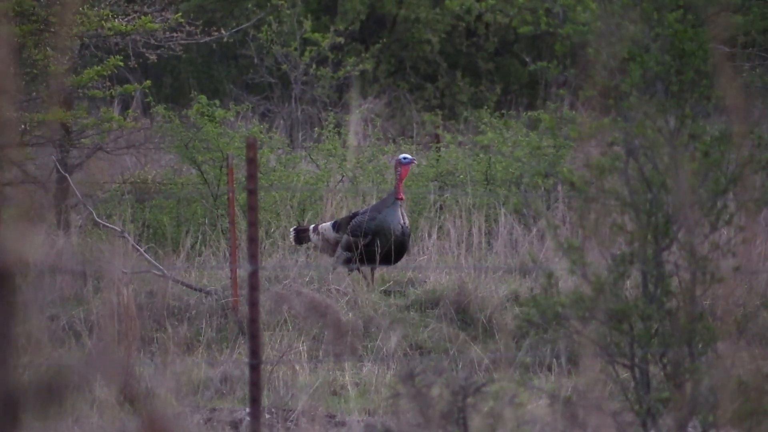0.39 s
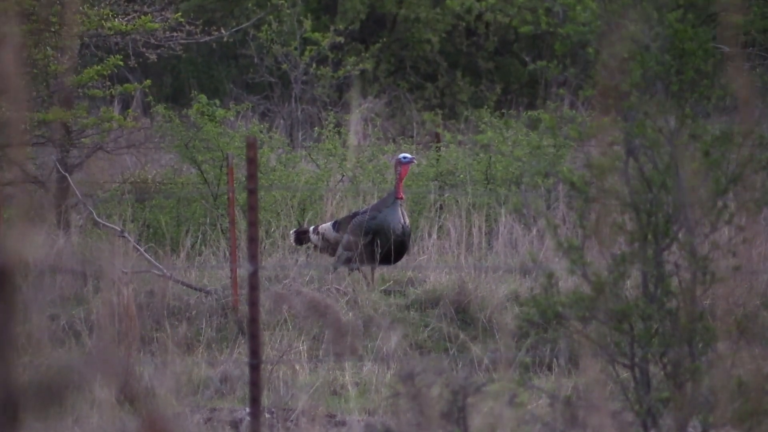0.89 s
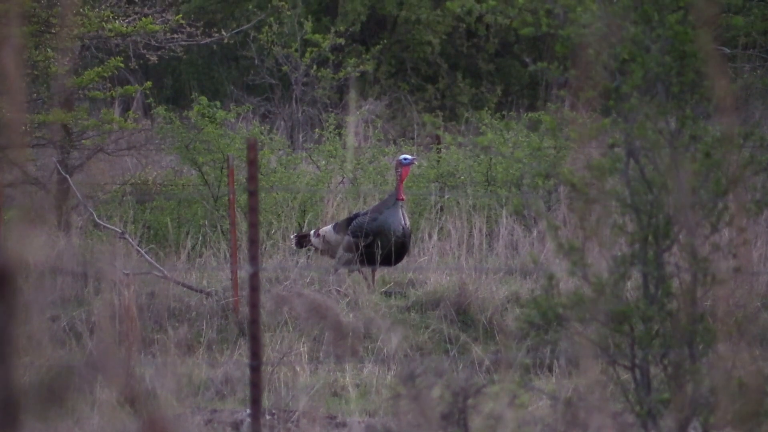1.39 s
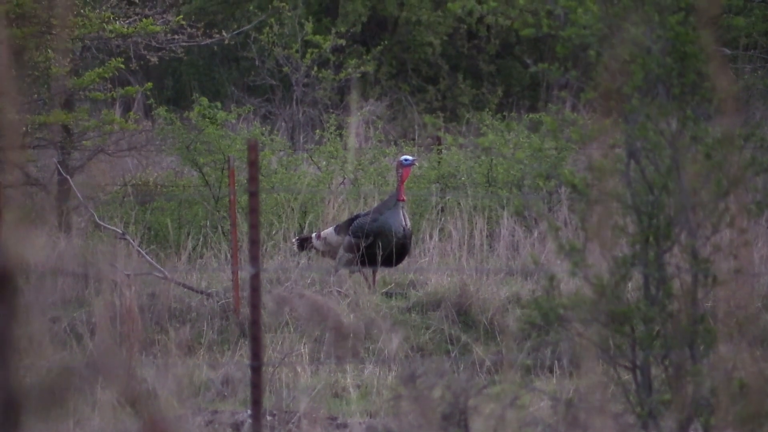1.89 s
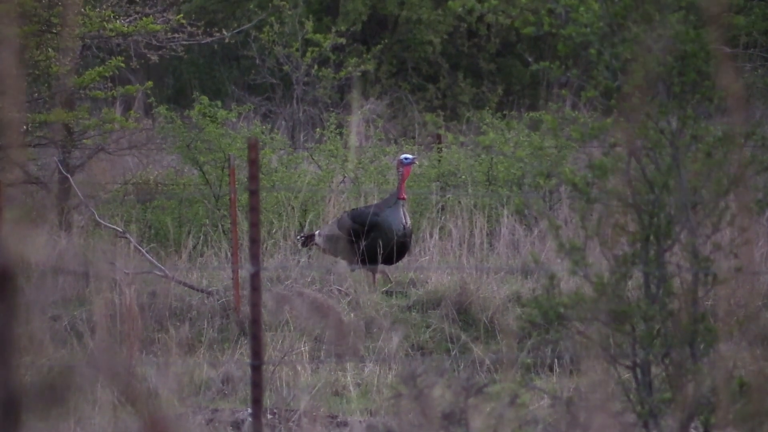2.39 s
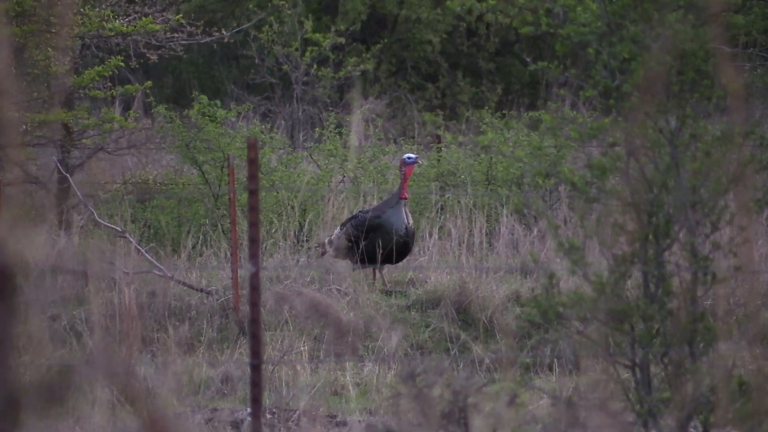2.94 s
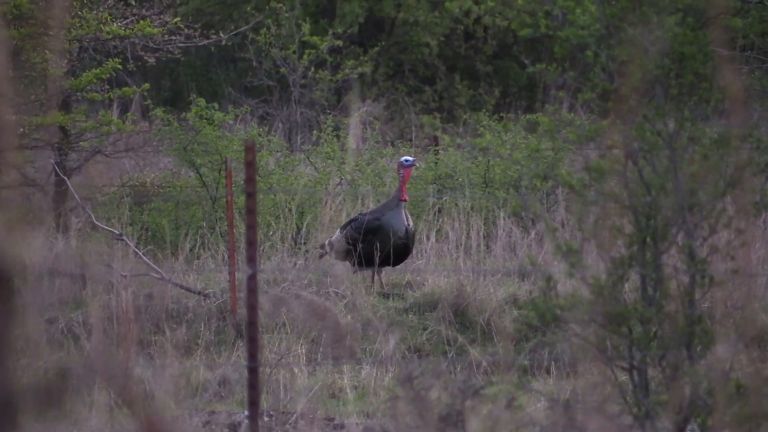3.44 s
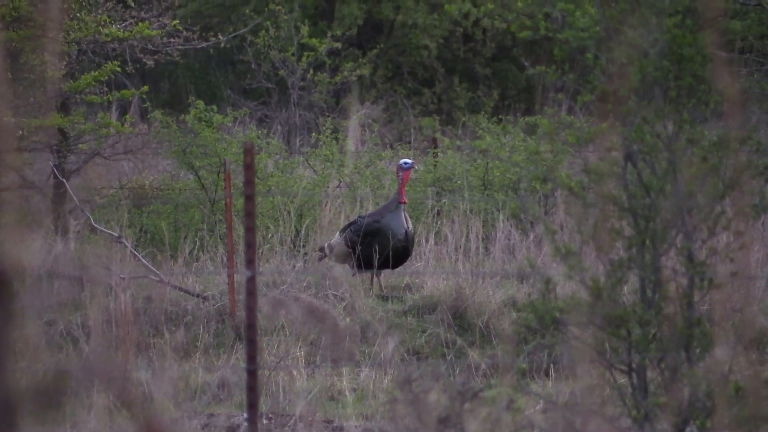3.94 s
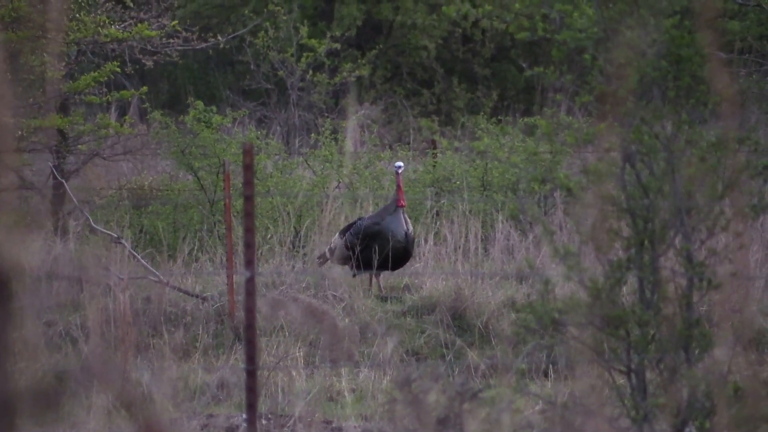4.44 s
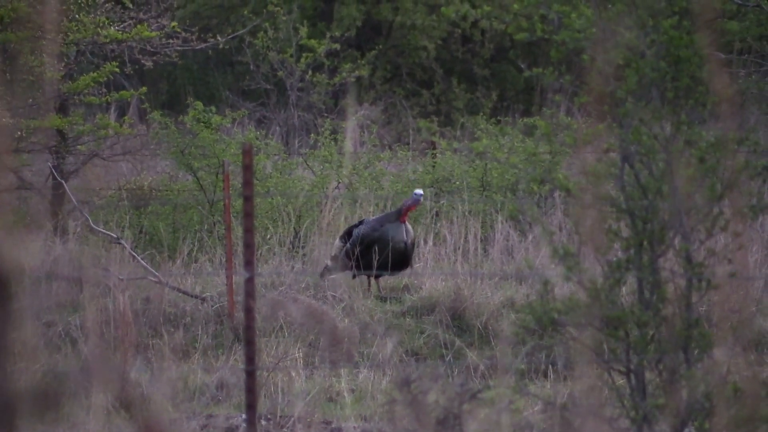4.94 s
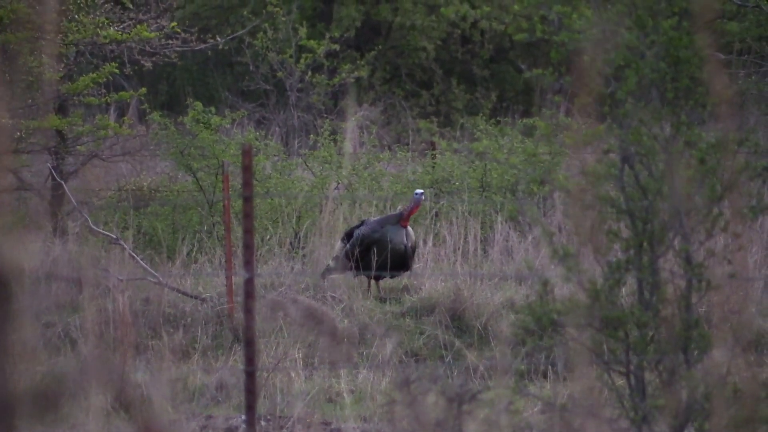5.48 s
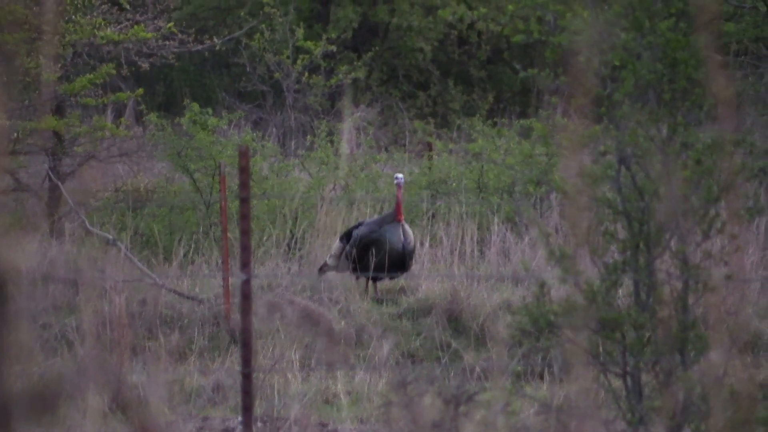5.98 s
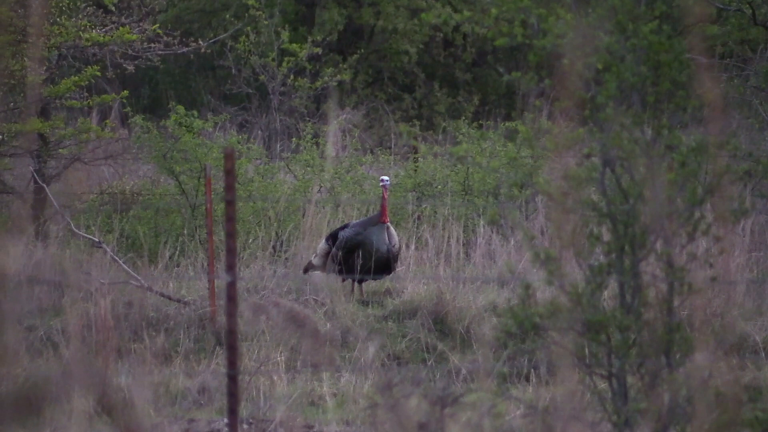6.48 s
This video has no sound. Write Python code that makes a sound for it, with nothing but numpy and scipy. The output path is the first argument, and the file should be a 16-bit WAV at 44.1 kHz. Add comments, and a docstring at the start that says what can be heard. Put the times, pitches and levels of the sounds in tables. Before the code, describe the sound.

Outdoors at a wood's edge, small birds chirp near and far over soft air and low wind rumble, with a thin high wheezy call repeating. A few dry stalks tick early on. Later a quick trill begins, and a turkey gobbles once, loud and rattling, echoing faintly off trees as a strong gust thumps the microphone. Sound sits almost wholly on the left.

```python
"""A brushy field at the edge of a wood, where a wild turkey gobbles once among songbirds near and far.
The gobble is pulses of throat-filtered harmonics, the songs gliding near-pure tones, the wheezes a few
high harmonics; sparse echoes from the trees return the calls. Shaped noise makes the air and the wind on
the microphone, with one strong gust during the gobble, and decaying noise makes the snaps of dry stalks.
The microphone feeds the left input only; the right input carries its own hiss and a trace of the bass."""
import sys
import numpy as np
from scipy import signal
from scipy.io import wavfile
from scipy.ndimage import uniform_filter1d

SR = 44100
rng = np.random.default_rng(int(sys.argv[2]) if len(sys.argv) > 2 else 0)


def store_wav(level_fs):
    """Save 16-bit WAV to argv[1]."""
    pcm = np.round(np.clip(np.atleast_2d(level_fs), -1, 1) * 32767)
    wavfile.write(sys.argv[1], SR, pcm.T.astype(np.int16))


def linear_from_db(decibels):
    """Turn decibels (scalar or array-like) into linear amplitude factors; 0 gives 1."""
    return 10 ** (np.asarray(decibels, float) / 20)


N = 291060  # samples, 6.6 s


def read(points, hz):
    """Interpolates a spectrum along log frequency, the scale on which pitch is heard."""
    f, value = np.transpose(points)
    return np.interp(np.log(hz + 1), np.log(f + 1), value)


def evened(x):
    """Normalises a signal to unit rms, so that a gain alone sets its level."""
    return x / np.sqrt(np.mean(x ** 2) + 1e-20)


def add(mix, s, sound):
    """Superposes a sound on the mix from time s, as pressures add."""
    part = mix[max(round(s * SR), 0):][:len(sound)]
    part += sound[:len(part)]


def flutter(count, size):
    """Low-pass random modulation: noise averaged twice over size samples, with rms 1."""
    smooth = uniform_filter1d(rng.standard_normal(count), size)
    return evened(uniform_filter1d(smooth, size))


def noise(colour, patchy_db, size):
    """Coloured noise by spectral synthesis: random short-time spectra with drifting patches, rms 1."""
    frames, hz = 4 * N // size + 5, np.fft.rfftfreq(size, 1 / SR)
    real, imaginary, patches = rng.standard_normal((frames, len(hz), 3)).T
    patches = uniform_filter1d(patches, size=10, axis=0)
    patches = evened(uniform_filter1d(patches, size=10, axis=1))
    gains = linear_from_db(read(colour, hz)[:, None] + patchy_db * patches)
    spectra = (real + 1j * imaginary) * gains
    return evened(signal.istft(spectra, nperseg=size, noverlap=3 * size // 4)[1][:N])


def gobble():
    """Source-filter voice: harmonic pulses, weak in the fundamental, lifted by throat resonances."""
    # throat pulses: (centre [s], pitch [Hz], rise [share], level before the high-pass [dB],
    # slope above the knee [dB per octave])
    pulses = [(4.863, 634, 0.0021, -33.5, -60), (4.91, 581.7, 0.084, -37, -24.5),
              (4.923, 673, 0.067, -29.5, -2.5), (4.939, 712, 0.019, -40, -10), (4.968, 686, 0.02, -61, -12),
              (4.986, 684, 0.078, -53, -13), (5.003, 691, -0.069, -59, -4), (5.042, 607, -0.17, -63, -10.5),
              (5.056, 687, -.063, -41.5, -5.5), (5.06, 570, -0.039, -48.5, -6),
              (5.084, 663, 0.049, -52.5, -7.5), (5.093, 556.4, -.23, -39.5, -4),
              (5.101, 657, 0.024, -40, -6), (5.116, 713, 0.036, -47, -2.5), (5.132, 708, 0.054, -44, -3.5),
              (5.149, 545, 0.028, -52, -20.5), (5.167, 501, -.1, -53, -26), (5.199, 486, -.2, -49, -3.5),
              (5.208, 597, -0.064, -49.5, -3), (5.23, 674, -.068, -57, -21.5),
              (5.249, 513, -0.224, -44.5, -3.5), (5.253, 690, 0.014, -47.5, -5),
              (5.266, 615, 0.054, -52, -20.5), (5.299, 599, 0.11, -46.5, -10.5),
              (5.306, 695, 0.063, -60, -5), (5.32, 597, 0.05, -52.5, -2.5), (5.321, 532, -0.088, -52, -15),
              (5.355, 512, -0.26, -45, -7.5), (5.365, 640, 0.034, -51, -3.5),
              (5.377, 557, 0.075, -46, -6.5), (5.387, 599, 0.058, -43.5, -5),
              (5.399, 646, -0.025, -51, -5.5), (5.406, 611, -0.028, -48.5, -9),
              (5.415, 547, -0.2, -49.5, -2.5), (5.427, 534, 0.016, -56, -3.5),
              (5.472, 502, -0.17, -47.5, -7), (5.506, 526, 0.11, -60, -14), (5.544, 589, -0.0095, -50, -17),
              (5.595, 474, -0.12, -51, -24.5), (5.708, 587, 0.085, -57, -31.5)]
    # relative voice spectrum: (frequency [Hz], gain [dB])
    voice = [(540, -65), (700, 4), (1000, 4.5), (2000, 2), (3500, 6.5), (5000, -7), (7500, -12),
             (11000, -19.5), (14000, -31)]
    # throat resonances: (frequency [Hz], half width [Hz], lift added to unit gain [dB])
    throat = [(984, 75, 15.5), (1347, 33, 11), (1830, 120, 11)]
    pulse_s, dull_s_per_db = .018, .0003  # duller pulses, with the beak less open, last longer
    loud_db, loud_s_per_db = -40, .0005  # so do those louder than this
    sag = 125  # share of the pitch per s squared
    jitter, rasp = .012, .12  # rms roughness of pitch and of level, as shares
    knee = 1.4  # times the most lifted harmonic
    out = np.zeros(N)
    for s, hz, rise, db, tilt_db in pulses:
        length = pulse_s + dull_s_per_db * abs(tilt_db) + loud_s_per_db * max(db - loud_db, 0)
        u = np.linspace(-1, 1, round(length * SR))
        pitch = hz * (1 + rise * u / 2 - sag * (length * u) ** 2)  # the pitch sags at both ends
        pitch *= 1 + jitter * flutter(len(u), size=60)
        order = np.arange(1, 22)[:, None]
        f = order * pitch
        lift = 1 + sum(linear_from_db(lift_db) / (1 + ((f - at_hz) / width_hz) ** 2)
                       for at_hz, width_hz, lift_db in throat)
        knee_hz = knee * f[lift.mean(1).argmax()].mean()
        octaves_above = np.log2(np.maximum(f / knee_hz, 1))
        gains = lift * linear_from_db(read(voice, f) + tilt_db * octaves_above)
        # a phase lag with the square of the order staggers the harmonics
        phase = 2 * np.pi * np.cumsum(f, axis=1) / SR - 0.315 * order ** 2
        tone = (gains * np.cos(phase)).sum(0)
        tone *= 1 + rasp * flutter(len(u), size=12)
        envelope = np.sqrt(1 - u ** 2) ** 1.8
        add(out, s - length / 2, linear_from_db(db) * evened(tone) * envelope)
    # a high-pass at 560 Hz keeps the gobble thin in the bass
    return signal.sosfilt(signal.butter(4, 560, "highpass", fs=SR, output="sos"), out)


def wheezes():
    """Selective radiation: only a few high harmonics of a low, arching, then dropping pitch pass the beak."""
    # calls: (start [s], length [s], level [dB], top pitch [Hz], closing fall [s])
    calls = [(-.03, 0.22, -69.5, 607, 0.022), (0.701, .22, -69, 601.5, .02), (1.409, .24, -71, 608, .085),
             (2.086, 0.23, -70, 612, 0.031), (2.693, 0.24, -69, 607, .02), (3.675, 0.19, -72.5, 600, 0.037),
             (4.366, .225, -70.5, 608, 0.0202), (5.637, .23, -68.5, 614, 0.017),
             (6.274, .21, -68.5, 611, .05)]
    # harmonics that pass: (order, gain [dB])
    orders = [(10, -7), (11, -14), (12, 1.5), (13, -31), (14, -20), (15, -17.5), (18, -29)]
    top_at, arch_depth, fall = .58, .032, .07  # shares: of the length, then of the top pitch
    waver = .003  # rms slow pitch waver, share
    start_db, fade_db = 2.5, -3  # the call begins louder and closes softer
    out = np.zeros(N)
    for s, length, db, top_hz, fall_s in calls:
        t = np.arange(max(-s, 0), length, 1 / SR)  # a call under way at time 0 lacks its start
        u = t / length
        closing = np.clip(1 - (length - t) / fall_s, 0, 1)
        arch = 1 - arch_depth * np.cos(np.pi * u / top_at / 2) ** 2 - fall * closing
        arch += waver * flutter(len(t), size=1200)
        hoarse = .003 + .02 * u ** 10  # grows at the end
        pitch = top_hz * arch * (1 + hoarse * flutter(len(t), size=100))
        turns = 2 * np.pi * np.cumsum(pitch) / SR
        stack = sum(linear_from_db(gain_db + 3.25 * flutter(len(t), size=200)) * np.sin(round(k) * turns)
                    for k, gain_db in orders)
        level_db = db + 1.9 * flutter(len(t), size=600) + start_db * (1 - u) ** 2 + fade_db * closing
        edges = np.clip(np.minimum(t / 0.016, (length - t) / 0.012), 0, 1)
        add(out, s, np.sqrt(2) * linear_from_db(level_db) * edges * stack)
    return out


def whistle(mix, s, length, first_hz, middle_hz, last_hz, db, swell_db=0):
    """Frequency modulation: a near-pure tone bends through three pitches and may swell or fade."""
    u = np.linspace(-1, 1, round(length * SR))
    bend_hz = (first_hz + last_hz) / 2 - middle_hz
    hz = middle_hz + (last_hz - first_hz) / 2 * u + bend_hz * u ** 2
    shape = signal.windows.tukey(len(u), min(.016 / length, 1))
    shape = shape * linear_from_db(swell_db * u + flutter(len(u), size=300))
    add(mix, s, np.sqrt(2) * linear_from_db(db) * shape * np.sin(2 * np.pi * np.cumsum(hz) / SR))


def songbirds():
    """Gliding tones: a trill turning from arches to falls, runs of one note, and single whistles."""
    # trill loudness: (time [s], level [dB])
    trill_level = [(4.1, -66), (4.75, -65), (5.5, -67.5), (5.8, -70.5), (6.25, -66), (6.6, -62)]
    # runs of one repeated note: (start [s], notes, gap [s],
    # note: (length [s], first [Hz], middle [Hz], last [Hz], level [dB]))
    runs = [(.055, 5, .0725, (.028, 4480, 4030, 3290, -73)),
            (6.345, 4, .0693, (.025, 3970, 3650, 3300, -66)),
            (6.36, 4, .066, (.03, 3090, 3300, 3540, -68.5))]
    # single whistles, those under 1.7 kHz from far off:
    # (start [s], length [s], first [Hz], last [Hz], level [dB])
    singles = [(0.244, 0.11, 3370, 3460, -80), (0.474, .12, 3360, 3470, -80), (.94, 0.06, 4020, 3860, -79),
               (1.174, 0.12, 3370, 3470, -79.5), (3.105, 0.185, 3130, 3070, -82),
               (3.507, 0.03, 750, 770, -74), (.36, .04, 3250, 2950, -78), (.671, .032, 3140, 2880, -73),
               (.96, .071, 3280, 2530, -73.5), (1.23, .03, 3000, 2770, -73),
               (1.529, 0.047, 2980, 2690, -70.5), (1.61, .044, 2440, 2560, -72.5),
               (1.78, .037, 3330, 3230, -75), (1.841, 0.065, 3040, 2620, -70),
               (1.92, .067, 2590, 2420, -75), (2.09, .039, 3100, 2800, -72),
               (2.129, 0.082, 3420, 3080, -74), (2.18, 0.072, 3080, 2430, -69.5),
               (2.82, 0.037, 2600, 2330, -75), (3.37, 0.044, 2910, 2450, -76),
               (3.542, 0.16, 3380, 3020, -72), (3.585, 0.019, 3720, 2670, -61),
               (3.852, .23, 3350, 2950, -69), (4.335, 0.12, 3500, 3560, -71),
               (4.43, 0.073, 3585, 3630, -83), (4.58, 0.1, 3620, 3610, -72), (5.63, 0.072, 3600, 3580, -68),
               (5.82, 0.2, 3560, 3515, -65.5), (6.11, 0.15, 3504, 3460, -66), (3.1, 0.067, 698, 781, -65.5),
               (3.2, 0.058, 758, 688, -70), (3.36, 0.075, 650, 752, -64.5), (3.47, 0.07, 917, 847, -66),
               (3.691, 0.12, 1070, 1038, -62), (4.036, 0.022, 1330, 1090, -64.5),
               (4.18, 0.055, 757, 684, -62), (4.229, 0.051, 1250, 1104, -61.5),
               (4.23, 0.053, 608, 605, -62), (6.4, 0.2, 1647, 1500, -78.5)]
    # trill note: (length [s], first [Hz], middle [Hz], last [Hz])
    arch, fall = (.045, 3450, 3840, 3740), (.034, 3950, 3600, 3180)
    out = np.zeros(N)
    for k in range(41):
        # arches turn to falls between notes 20 and 28
        note = [np.interp(k, (20, 28), ends) for ends in zip(arch, fall)]
        s = 4.095 + .0595 * k + .00007 * k ** 2  # the gaps slowly widen
        whistle(out, s, *note, np.interp(s, *np.transpose(trill_level)))
    for s, count, gap, note in runs:
        for k in range(round(count)):
            whistle(out, s + gap * k, *note)
    for s, length, first_hz, last_hz, db in singles:
        whistle(out, s, length, first_hz, (first_hz + last_hz) / 2, last_hz, db)
    return out


def phrases():
    """Directivity and scintillation: a far bird repeats six notes, its treble varying as it turns."""
    # notes of the phrase: (delay [s], length [s], first [Hz], last [Hz], level [dB])
    notes = [(0, 0.03, 3640, 5400, -60), (0.069, 0.0203, 2606, 2383, -63), (0.125, 0.067, 2673, 2823, -66),
             (0.169, 0.0397, 2957, 3097, -59), (.25, .052, 2270, 2570, -57.5),
             (0.336, 0.0502, 1663, 2080, -66.5)]
    # repeats: (start [s], level change [dB], treble slope above 3 kHz as the bird turns [dB per octave])
    starts = [(3.522, -1, -18), (3.968, .5, -3.5), (4.403, 0.5, -2), (4.846, -0.5, 3.5)]
    bow = .16  # share of the glide; glides start fast
    swell_per_octave_db, swell_hz = 9, 3100  # notes under swell_hz swell, higher ones fade
    out = np.zeros(N)
    for start, more_db, treble_db in starts:
        for s, length, first_hz, last_hz, db in notes:
            middle_hz = first_hz + (.5 + bow) * (last_hz - first_hz)
            turned_db = db + more_db + treble_db * np.log2(max(middle_hz / 3000, 1))
            swell_db = swell_per_octave_db * np.log2(swell_hz / middle_hz)
            whistle(out, start + s, length, first_hz, middle_hz, last_hz, turned_db, swell_db)
    return out * linear_from_db(3 * flutter(N, size=120))  # leaves and moving air break the notes up


def chorus():
    """Random superposition: faint short whistles of birds further off, at independent times."""
    out = np.zeros(N)
    per_s, faintest_db = 42, -86
    for when, height, duration, drop, loudness in rng.random((round(per_s * N / SR), 5)):
        hz = 2450 + 1400 * height
        first_hz, last_hz = hz * (1 + 0.1044 * drop), hz * (1 - 0.049 * drop)
        length = 0.0203 + 0.036 * duration
        whistle(out, when * N / SR, length, first_hz, hz, last_hz, faintest_db + 8 * loudness)
    return out


def treeline(x):
    """Specular reflection: one clear, weaker copy, 76 ms late (its end wraps round to the start)."""
    return x + linear_from_db(-13) * np.roll(x, round(.076 * SR))


def wood(x, first_s):
    """Scattering reverberation: sparse echoes of random sign off trunks and brush decay band by band."""
    # decay by 60 dB: (frequency [Hz], t60 [s])
    decay = [(500, 5.7), (1300, 1.15), (2500, 0.86), (5000, 1.48), (8000, 0.44)]
    taps, first = np.zeros(SR), round(first_s * SR)
    at = np.arange(first, SR - 20, 20)
    taps[at + rng.integers(0, 20, len(at))] = rng.choice([-1., 1.], len(at))
    hz, t, z = signal.stft(taps, SR, nperseg=256)
    fading = linear_from_db(-60 * t / read(decay, hz)[:, None])
    tail = signal.istft(z * fading, SR, nperseg=256)[1]
    return signal.fftconvolve(x, tail / np.linalg.norm(tail))[:N]


def ticks():
    """Impulsive sources: dry stalks snap as decaying noise, band-limited as if dulled by distance."""
    # snaps: (time [s], starting level before the band-pass [dB])
    snaps = [(0.6918, -55), (1.0939, -52), (1.4027, -56), (1.408, -49.5), (1.5785, -49)]
    out, t = np.zeros(N), np.arange(200) / SR
    for s, db in snaps:
        add(out, s, linear_from_db(db - 60 * t / 0.0097) * rng.standard_normal(200))  # falls at 60 dB per 9.7 ms
    return signal.sosfilt(signal.butter(2, [2500, 8000], "bandpass", fs=SR, output="sos"), out)


def wind():
    """Turbulent pressure on the capsule: lumpy low noise and a brighter roar both follow the gusts."""
    # slow wind strength: (time [s], level [dB])
    strength = [(0, -48.5), (.15, -49.5), (.59, -44), (.73, -56), (1.14, -67), (1.4, -50), (2.7, -55.5),
                (3.16, -45), (3.7, -55), (4.28, -47.5), (4.34, -57.5), (5.0, -53), (5.22, -35.5),
                (5.55, -32), (5.75, -38.5), (6.2, -41), (6.3, -45), (6.6, -49)]
    # short pushes of air: (time [s], rise over the wind [dB])
    buffets = [(.05, 13), (.4, 1), (.5, 7), (.83, 8), (1.19, 14.5), (1.34, 10), (1.54, 11), (2.19, 3),
               (2.96, 1.5), (3.56, 5.5), (3.9, 11), (5.325, 10.5), (5.7, 7), (6.361, 6.5)]
    # relative spectra of the rumble and of the gusts' brighter edge: (frequency [Hz], density [dB per Hz])
    rumble_colour = [(7.1, -63), (12, -10.5), (48, 2), (65, 0), (183, -17.5), (246, -29), (290, -29.5),
                     (420, -45), (550, -67), (920, -120)]
    roar_colour = [(120, -19), (220, 10), (400, -2.5), (700, 2), (1100, -70)]
    buffet_s = 0.022  # from the peak to 1/e of the rise in dB
    t = np.arange(N) / SR
    gust_db = np.interp(t, *np.transpose(strength))
    gust_db += sum(more_db * np.exp(-((t - at) / buffet_s) ** 2) for at, more_db in buffets)
    rumble = noise(rumble_colour, patchy_db=2.0, size=4096)
    rumble *= linear_from_db(gust_db + 1.2 * flutter(N, size=1500))
    roar = noise(roar_colour, patchy_db=1.5, size=2048)
    roar *= linear_from_db(-27 + uniform_filter1d(gust_db, size=8000))  # 27 dB under the smoothed gusts
    return rumble + roar


def air():
    """Stationary random noise: a steady broad bed, strongest in the bass."""
    # relative spectrum: (frequency [Hz], density [dB per Hz])
    colour = [(15, -27), (25, -5), (53, -7), (96, -2), (188, -8.5), (313, -20), (848, -20.5), (1450, -33.5),
              (3080, -35), (5280, -41), (6910, -43), (7900, -45), (13500, -47.5), (15500, -45.5)]
    return linear_from_db(-56) * noise(colour, patchy_db=1.19, size=2048)


def scene():
    """Linear superposition: all sources and their echoes add at one microphone."""
    turkey, wheezer, birds = gobble(), wheezes(), songbirds()
    singer = treeline(phrases() + chorus())
    mono = turkey + linear_from_db(-12) * wood(turkey, .012)
    mono += wheezer + linear_from_db(-8.5) * wood(wheezer, .01)
    mono += birds + linear_from_db(-9) * wood(birds, .02)
    mono += singer + linear_from_db(-1) * wood(singer, .005)
    mono += ticks() + wind() + air()
    return np.array([mono, np.zeros(N)])


def roll_off(x):
    """The treble ends steeply here."""
    return signal.sosfilt(signal.butter(12, 15630, fs=SR, output="sos"), x)


def record(dry):
    """Crosstalk: the left input is amplified; the open right one hisses and picks up a little left bass."""
    preamp_db, hiss_db = 4.5, -75
    leak_db, leak_hz = -56, 74.7  # gain and low-pass corner of the crosstalk
    left = linear_from_db(preamp_db) * dry[0]
    leak = signal.sosfilt(signal.butter(5, leak_hz, fs=SR, output="sos"), left)
    right = linear_from_db(leak_db) * leak + linear_from_db(hiss_db) * rng.standard_normal(N)
    return roll_off(np.array([left, right]))


dry = scene()
out = record(dry)
store_wav(out)
```